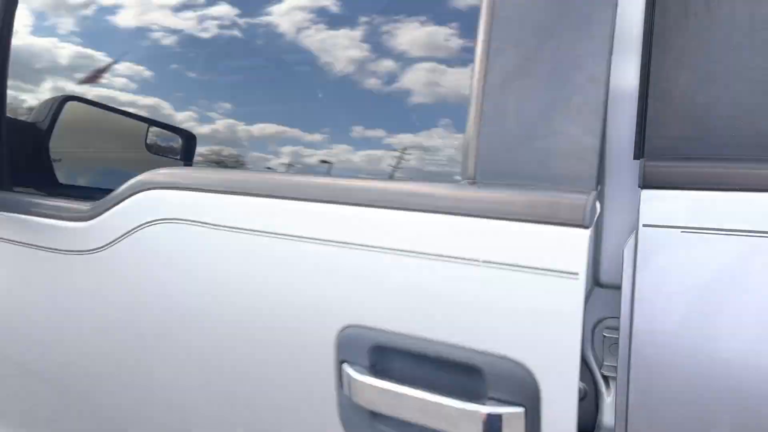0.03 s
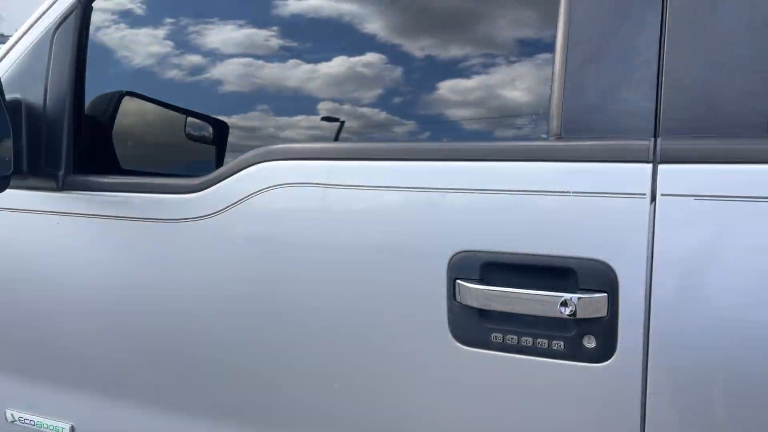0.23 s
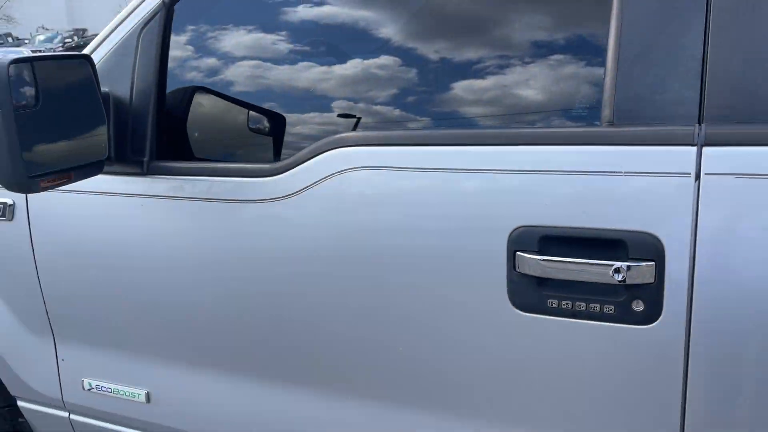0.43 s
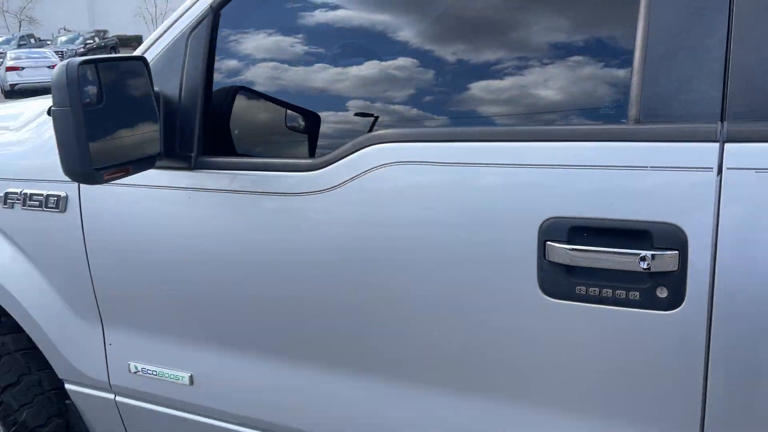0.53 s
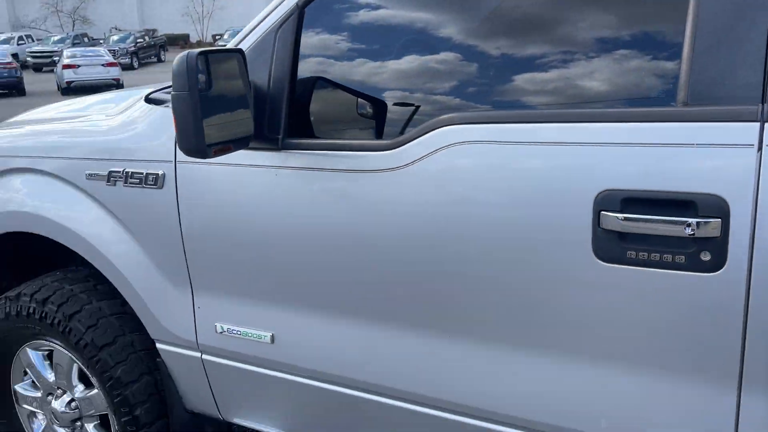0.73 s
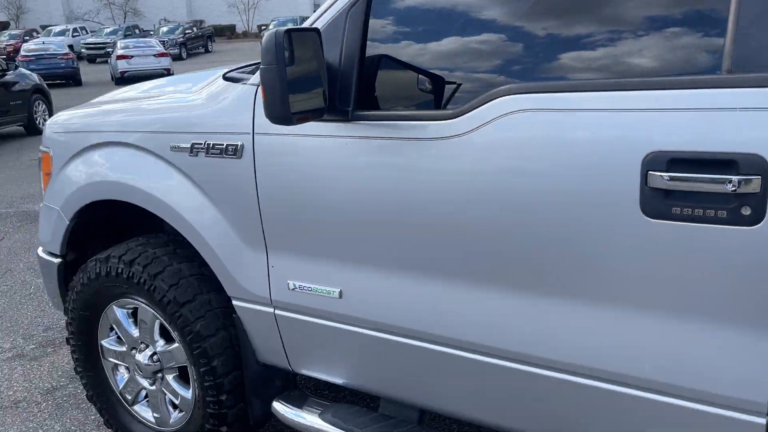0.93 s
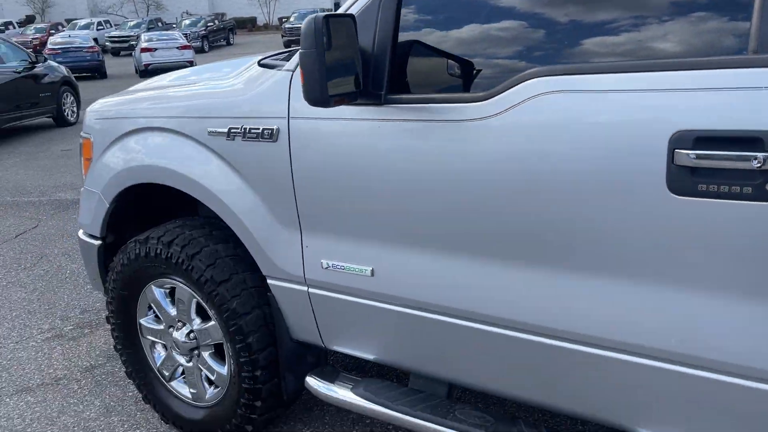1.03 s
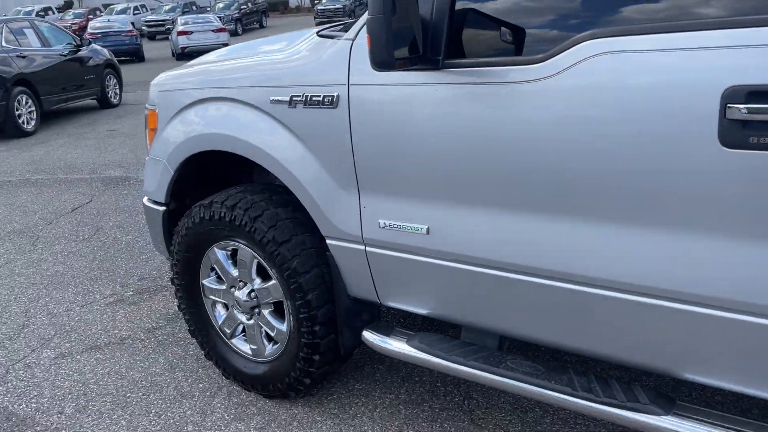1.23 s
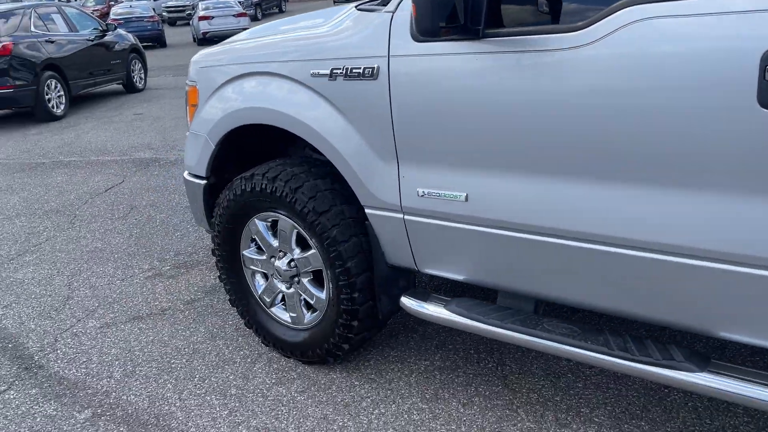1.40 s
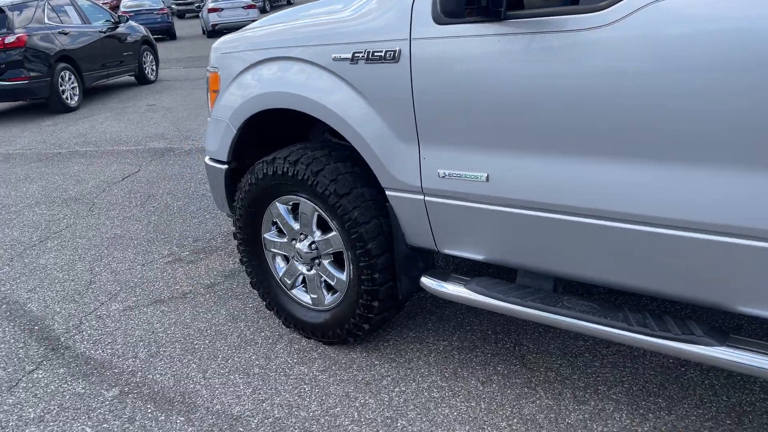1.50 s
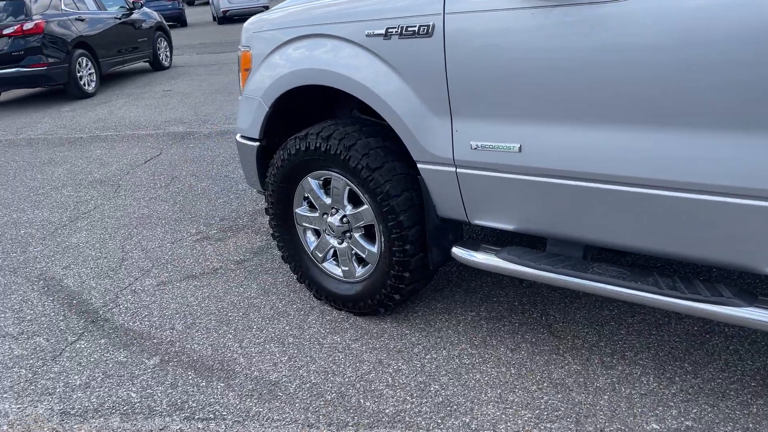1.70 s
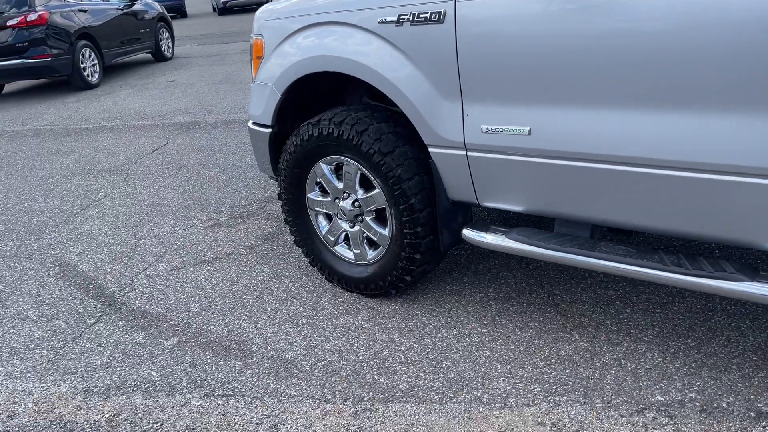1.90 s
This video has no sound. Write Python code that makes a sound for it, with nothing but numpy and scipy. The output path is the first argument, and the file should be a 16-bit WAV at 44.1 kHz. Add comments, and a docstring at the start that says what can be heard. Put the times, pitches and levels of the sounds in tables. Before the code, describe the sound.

A pickup door slams almost at once, latch metal clattering over a heavy hollow thud and quick softer thumps; then light wind buffets the close handheld microphone, with faint shoe scuffs and distant traffic in an open lot.

```python
"""A pickup door is slammed on an open car lot.
Shoes scuff while the hinges rub and a rush of air swells; then rough metal contacts clatter at the latch.
The door's mass lands in four blows that ring the skin, shake the trim and boom in the seals and cab.
The shut cab throbs briefly and the slam comes back thinly from the parked cars as the steel rings out.
Wind flutters and bumps softly throughout, more scuffs follow, and traffic hums steadily far away."""
import sys
import numpy as np
from scipy import signal
from scipy.fft import rfft, irfft
from scipy.io import wavfile
from scipy.ndimage import uniform_filter1d

SR = 44100
rng = np.random.default_rng(int(sys.argv[2]) if len(sys.argv) > 2 else 0)


def materialize(psi):
    """Save the field psi as 16-bit PCM at rate SR to the path in sys.argv[1].

    A 1-D psi becomes a single channel; in a 2-D psi each row is a channel.
    """
    bounded = np.clip(np.atleast_2d(psi).T, -1, 1)
    quanta = np.round(bounded * 32767).astype(np.int16)
    wavfile.write(sys.argv[1], SR, quanta)


N = 85995
TIME = np.arange(N) / SR


def from_db(db):
    """Decibels to gain."""
    return 10 ** (np.asarray(db) / 20)


def rms_one(x):
    """Scale to unit power."""
    return x / np.sqrt(np.mean(x ** 2) + 1e-20)


def noise(spectrum, tilt_db=0):
    """Unit noise of a given colour, tilted in dB per octave above 400 Hz; next to nothing above its last point."""
    octave = np.log2(np.maximum(np.fft.rfftfreq(N, 1 / SR), 1))
    hz, db = np.transpose(spectrum)
    colour_db = np.interp(octave, np.log2(hz), db, right=-120)
    tilt = tilt_db * np.maximum(octave - np.log2(400), 0)
    white = rng.standard_normal(N)
    return rms_one(irfft(rfft(white) * from_db(colour_db + tilt), N))


def grain(depth_db, size=40):
    """Random unevenness of level, smoothed over size samples (about a millisecond by default)."""
    drift = rms_one(uniform_filter1d(rng.standard_normal(N), size))
    return rms_one(from_db(depth_db * drift))


def burst(start, rise, decay):
    """Quick rise, then exponential decay; both time constants in seconds."""
    age = np.maximum(TIME - start, 0)
    attack = 1 - np.exp(-np.minimum(age / rise, 40))
    return attack * np.exp(-np.minimum(age / decay, 40))


def ring(modes, hits, rise):
    """Every hit adds its energy to each mode, which dies away at its own rate."""
    fed = sum(from_db(2 * db) * burst(s, rise / 4, rise) for s, db, *_ in hits)
    fed = fed / (.8 * rise * SR)  # the area of one burst, so each hit feeds exactly its own energy
    out = 0
    for hz, db, t60 in modes:
        kept = np.exp(-2 * np.log(1000) / (t60 * SR))  # share of energy left after one sample
        energy = signal.lfilter([1], [1, -kept], fed + 1e-18)
        tone = np.sin(2 * np.pi * (hz * TIME + rng.random()))
        out = out + from_db(db) * np.sqrt(energy) * tone
    return out


def puffs(rows, rise_cycles, fray):
    """Pressure pulses of a few cycles, frayed by turbulence up to about twice their pitch."""
    out, white = 0, rng.standard_normal(N)
    for s, db, hz in rows:
        cycles = np.maximum(TIME - s, 0) * hz
        swell = np.minimum(cycles / rise_cycles, 40)
        envelope = swell * np.exp(1 - swell)  # peaks at 1
        lowpass = signal.butter(3, 2 * hz, fs=SR, output="sos")
        eddies = rms_one(signal.sosfilt(lowpass, white))
        out = out + from_db(db) * envelope * (np.sin(2 * np.pi * cycles) + fray * eddies)
    return out


# Metal contacts of latch and door.
# Each row: start in seconds, level in dB, decay time in seconds, brightness in dB per octave.
LATCH_CONTACTS = [(0.1651, -15, 0.0067, -3.5), (0.1732, -14.5, 0.0036, -0.5), (.177, -7.5, 0.01, 0.5),
                  (0.1786, -6.5, 0.0057, 1), (.187, -7.5, 0.0059, 0.5), (0.2062, -14, .002, 3),
                  (0.212, -10, .006, 1.5), (0.217, -8, .007, -5), (0.2434, -33, 0.0042, 0),
                  (0.2643, -14, 0.0017, 0.5), (0.2805, -17.5, 0.011, -1.5), (0.2883, -18, 0.0058, -2.5),
                  (0.312, -28.5, 0.0094, -7), (.359, -47.5, 0.011, 3)]
# Colour of the clatter. Each row: frequency in Hz, relative level in dB per Hz.
CLATTER_COLOUR = [(150, 10), (280, 0.5), (1100, 3), (1800, -2), (2800, -5), (4600, -8.5), (5400, -16.5),
                  (8500, -18.5), (12500, -26.5), (16000, -35.5)]
# Resonances of latch and frame. Each row: pitch in Hz, relative level in dB, 60 dB decay time in seconds.
STEEL_MODES = [(1011.5, 7, .24), (1140, 4, .18), (1312, 3, .24), (1446, 3, .28), (1685, 2, .16),
               (2166, 2, .2), (2626, 3, .17), (2798, 2, .17), (3340, 1, .12), (4220, 0, .12),
               (4647, 1, .14)]
CONTACT_RISE_S, STEEL_DB = 0.00072, -34


def latch():
    """Rough metal contacts in quick succession; each sets the steel of the frame ringing."""
    clatter = 0
    for s, db, decay, tilt in LATCH_CONTACTS:
        clatter = clatter + from_db(db) * burst(s, CONTACT_RISE_S, decay) * noise(CLATTER_COLOUR, tilt)
    return clatter + from_db(STEEL_DB) * ring(STEEL_MODES, LATCH_CONTACTS, CONTACT_RISE_S)


# The door's mass lands on the body. Each row: start in seconds, level in dB.
DOOR_BLOWS = [(0.18, -11.5), (0.217, -12.5), (0.2522, -20.5), (0.286, -18)]
# Resonances of door skin and cab. Each row: pitch in Hz, relative level in dB, 60 dB decay time in seconds.
PANEL_MODES = [(76, -13, .25), (123, -13, .4), (195.5, -8, .42), (255, -7, .42), (292, -16, .3),
               (451, -14, .42), (603, -15, .36), (720, -15, .33), (748, -16, .3), (818, -17, .27),
               (872, -18, .24)]
# Dense shudder of trim and body. Each row: frequency in Hz, relative level in dB per Hz.
SHUDDER_COLOUR = [(35, -16.5), (65, -10.5), (130, -9.5), (270, 6.5), (380, -5), (700, -14.5), (1500, -51.5)]
BLOW_RISE_S, PANEL_DB = .002, -4.5
SHUDDER_DB, SHUDDER_T60_S = -8, .42


def door_body():
    """Each cushioned blow rings the panel modes and shakes the trim."""
    decay = SHUDDER_T60_S / np.log(1000)
    shake_energy = sum((from_db(db) * burst(s, BLOW_RISE_S, decay)) ** 2 for s, db in DOOR_BLOWS)
    shudder = np.sqrt(shake_energy) * noise(SHUDDER_COLOUR)
    panel = ring(PANEL_MODES, DOOR_BLOWS, BLOW_RISE_S)
    return from_db(PANEL_DB) * panel + from_db(SHUDDER_DB) * shudder


# Short booms of squeezed air. Each row: start in seconds, envelope peak in dB, pitch in Hz.
SEAL_BOOMS = [(.183, -5.5, 260.5), (.187, -8, 106.8), (.2185, -7.5, 230.6), (.226, -15, 76),
              (.252, -11.5, 230), (.2885, -8, 190)]


def seals():
    """The door squeezes its seals and the cab air, giving short booms with a little turbulence."""
    return puffs(SEAL_BOOMS, rise_cycles=0.58, fray=.1)


# The throb's path, joined by straight lines. Each row: time in seconds, pitch in Hz, level in dB.
CAB_THROB = [(0.282, 190, -54), (0.298, 156.4, -19), (0.342, 98, -26), (0.36, 127, -9.5),
             (0.409, 75, -44.5)]


def cab():
    """One unbroken low throb of the shut cab, gliding in pitch and swelling again as the door settles."""
    s, hz, db = np.transpose(CAB_THROB)
    turns = np.cumsum(np.interp(TIME, s, hz)) / SR
    sounding = (TIME > s[0]) * (TIME < s[-1])
    return from_db(np.interp(TIME, s, db)) * sounding * np.sin(2 * np.pi * turns)


# Colour of the scatter, shared with the rush of air. Each row: frequency in Hz, relative level in dB per Hz.
SCATTER_COLOUR = [(200, 0.5), (700, -1), (1500, -5), (4500, -10), (10000, -19), (16000, -39)]
SCATTER_DB, SCATTER_T60_S = -25.5, 0.44  # the decay time is that of the lowest band
SCATTER_DULL_HZ = 17260  # a band starting here would die twice as fast


def scatter():
    """The slam comes back thinly from the cars around, as a noise wash whose treble dies first."""
    out, wash = 0, rfft(noise(SCATTER_COLOUR))
    hz = np.fft.rfftfreq(N, 1 / SR)
    edges = [0, 1500, 3000, 6000, 11500, 17000]
    first_blow = DOOR_BLOWS[0][0]
    for low, high in zip(edges, edges[1:]):
        t60 = SCATTER_T60_S / (1 + low / SCATTER_DULL_HZ)
        band = irfft(wash * (hz >= low) * (hz < high), N)
        out = out + band * burst(first_blow, 0.005, t60 / np.log(1000))
    return from_db(SCATTER_DB) * out * grain(3.4)


# Colour of the soft hinge rub. Each row: frequency in Hz, relative level in dB per Hz.
HINGE_COLOUR = [(300, -23), (480, 0.5), (850, 1.5), (1400, -10), (4000, -28)]
HINGE_DB, HINGE_DECAY_S = -39, 0.17
SWING_DB, SWING_SWELL_S = -23.5, 0.0046


def swing():
    """The hinge rub dies away; a rush of air swells as the gap closes and stops when the door lands."""
    ahead = DOOR_BLOWS[0][0] - TIME  # seconds left until the first blow
    swell = np.exp(-np.abs(ahead) / SWING_SWELL_S) * (ahead > 0)
    rush = from_db(SWING_DB) * swell * noise(SCATTER_COLOUR)
    rub = from_db(HINGE_DB) * np.exp(-TIME / HINGE_DECAY_S) * noise(HINGE_COLOUR)
    return rush + rub


# Rise and fall of the breeze. Each row: time in seconds, relative level in dB.
BREEZE = [(0, -46.5), (.04, -34), (.125, -44), (.2, -24), (.41, -34), (.53, -45), (.62, -28.5), (.80, -42),
          (1.06, -33.5), (1.13, -42.5), (1.23, -31), (1.40, -27.5), (1.45, -32), (1.59, -34.5), (1.68, -49),
          (1.81, -32), (1.95, -50.5)]
# Colour of the flutter. Each row: frequency in Hz, relative level in dB per Hz.
FLUTTER_COLOUR = [(25, -52), (45, -11), (70, 8.5), (110, 4), (180, -2), (280, -15), (450, -28.5)]
# Single soft bumps of air. Each row: start in seconds, envelope peak in dB, pitch in Hz.
AIR_BUMPS = [(.420, -23, 218), (.563, -28.5, 228.5), (.623, -21, 89), (.658, -21.5, 310), (1.246, -22, 271),
             (1.255, -21, 90), (1.313, -23, 267), (1.324, -13.5, 101), (1.346, -17.5, 256),
             (1.389, -20.5, 279), (1.398, -25, 117), (1.448, -21, 163), (1.498, -20, 160),
             (1.579, -26, 125.7), (1.799, -23, 150)]
# Colour of the coarse buffeting. Each row: frequency in Hz, relative level in dB per Hz.
BUFFET_COLOUR = [(200, 0), (600, -11), (1000, -26)]
WIND_DB, WIND_EVEN_S = 3.5, 0.06  # the flutter's own level is evened out over this window
BUFFET_DB, GUST_S = 8, 0.037  # gust strength is averaged over this window


def wind():
    """Low flutter follows the breeze and eddies bump the microphone; strong gusts add coarse buffeting."""
    flutter = noise(FLUTTER_COLOUR)
    flutter = flutter / np.sqrt(uniform_filter1d(flutter ** 2, int(WIND_EVEN_S * SR)) + 1e-6)
    breeze_db = WIND_DB + np.interp(TIME, *np.transpose(BREEZE))
    pressure = from_db(breeze_db) * flutter + puffs(AIR_BUMPS, rise_cycles=0.65, fray=.35)
    gust = uniform_filter1d(pressure ** 2, int(GUST_S * SR))
    return pressure + from_db(BUFFET_DB) * gust * noise(BUFFET_COLOUR)


# Shoes scuff the asphalt.
# Each row: start in seconds, level in dB, decay time in seconds, brightness in dB per octave.
SHOE_SCUFFS = [(-.02, -48, 0.053, -6), (.09, -59.5, 0.076, -3), (0.685, -53, 0.043, -2),
               (0.716, -44.5, 0.038, -4.5), (0.793, -48.5, 0.049, -3), (0.8648, -35, 0.002, -10.5),
               (0.8696, -33.5, 0.0037, -9.5), (.93, -56, 0.01, -2), (1.346, -51, 0.0031, 1),
               (1.3617, -42, .0015, 6), (1.362, -55.5, 0.023, 2.5), (1.441, -54.5, 0.028, -4),
               (1.635, -59, 0.018, -3.5)]
# Colour of the grit underfoot. Each row: frequency in Hz, relative level in dB per Hz.
GRIT_COLOUR = [(800, -21.5), (2800, 3.5), (4500, 2.5), (6500, -2.5), (10000, -6), (12500, -20.5),
               (16000, -30.5)]
SCUFF_SWELL, SCUFF_GRAIN_DB = .3, 4  # swell as a share of the decay time


def shoes():
    """Gritty scuffs; each swells for a share of its decay time, so ticks are sharp and drags are soft."""
    rub = 0
    for s, db, decay, tilt in SHOE_SCUFFS:
        rub = rub + from_db(db) * burst(s, SCUFF_SWELL * decay, decay) * noise(GRIT_COLOUR, tilt)
    return rub * grain(SCUFF_GRAIN_DB)


# Colour of the distant traffic. Each row: frequency in Hz, relative level in dB per Hz.
TRAFFIC_COLOUR = [(90, -5), (200, -14.5), (400, -3), (700, -2), (1100, -0.5), (1600, -5.5), (2500, -17.5),
                  (4000, -29), (6300, -47.5), (10000, -52.5), (16000, -64.5)]
TRAFFIC_DB = -44


def traffic():
    """Far engines and tyres blur into a dull steady noise that wavers slightly."""
    return from_db(TRAFFIC_DB) * noise(TRAFFIC_COLOUR) * grain(.5, size=SR // 10)


def scene():
    """The slam, wind and scuffs over distant traffic."""
    slam = latch() + door_body() + seals() + cab() + scatter() + swing()
    return (slam + wind() + shoes() + traffic())[None]


RUMBLE_CUT_HZ, CUTOFF_HZ = 46, 15900


def record(dry):
    """The deepest rumble is cut, peaks are rounded, the top is cut."""
    highpass = signal.butter(3, RUMBLE_CUT_HZ, "high", fs=SR, output="sos")
    lowpass = signal.ellip(10, .1, 80, CUTOFF_HZ, fs=SR, output="sos")
    x = signal.sosfilt(highpass, dry)
    rounded = .8 * np.tanh(x / .8)
    return signal.sosfilt(lowpass, rounded)


dry = scene()
out = record(dry)
materialize(out)
```